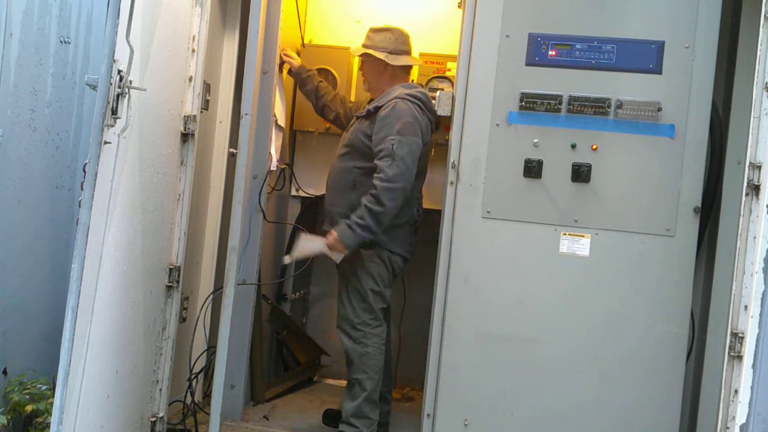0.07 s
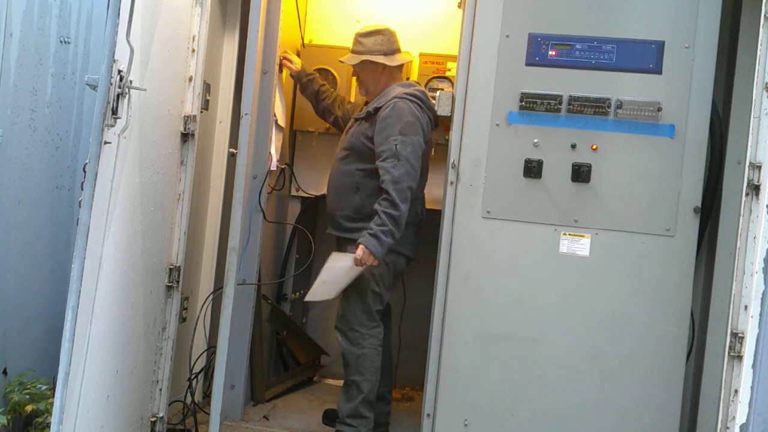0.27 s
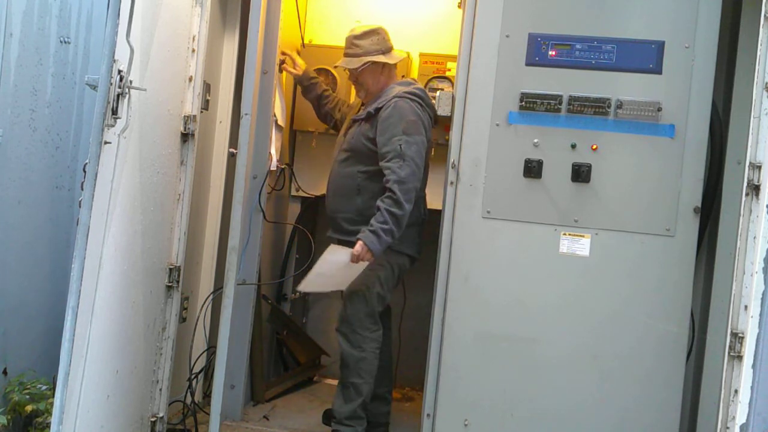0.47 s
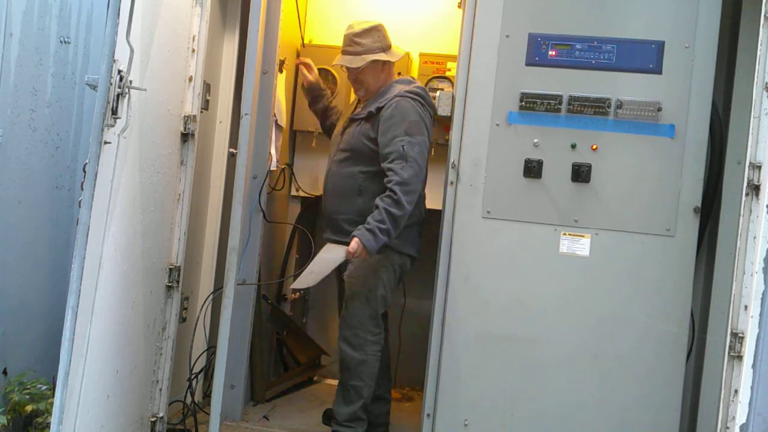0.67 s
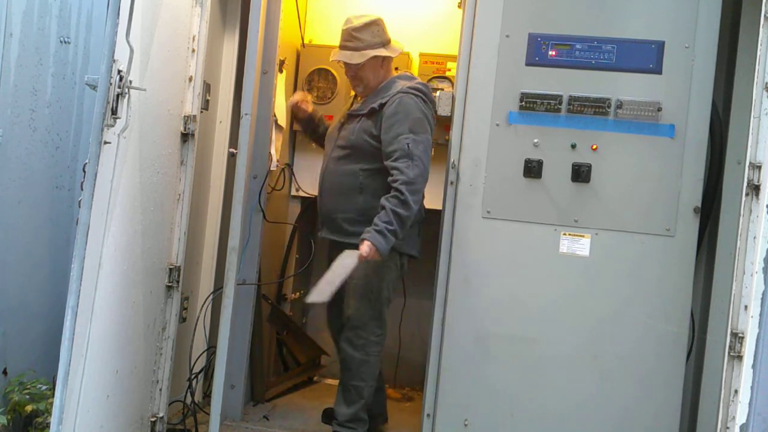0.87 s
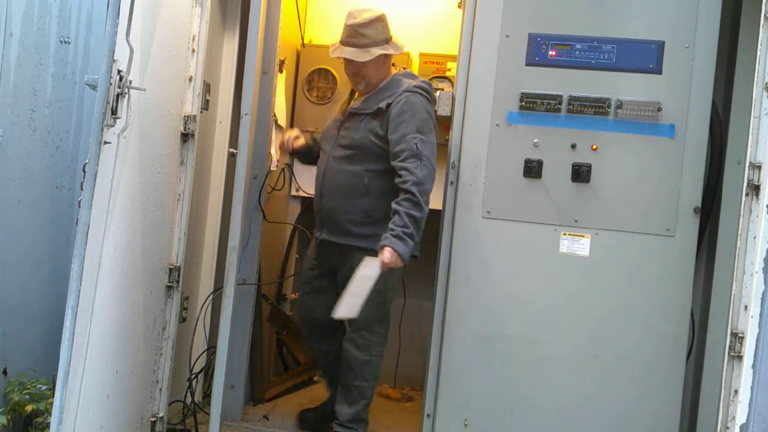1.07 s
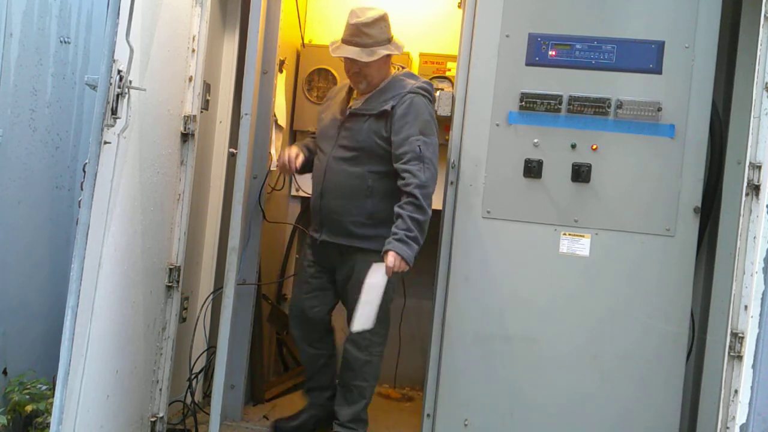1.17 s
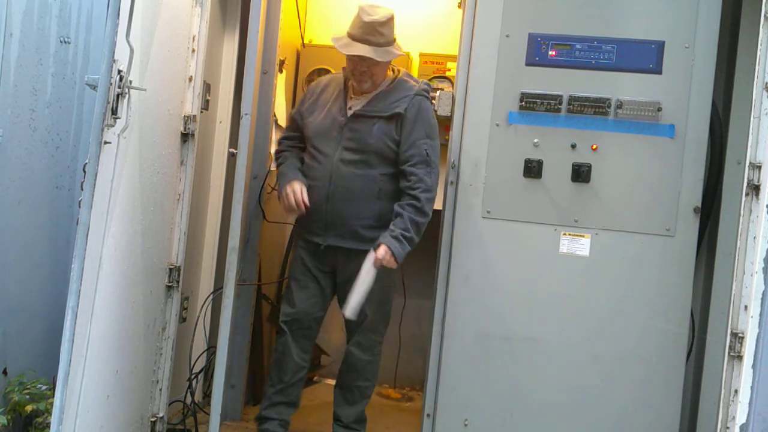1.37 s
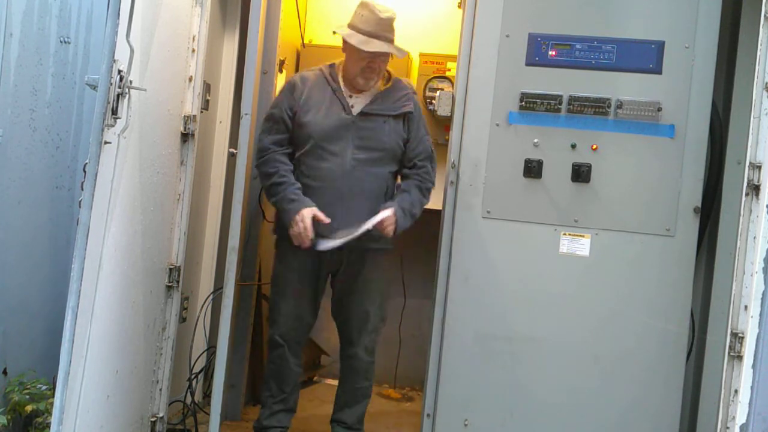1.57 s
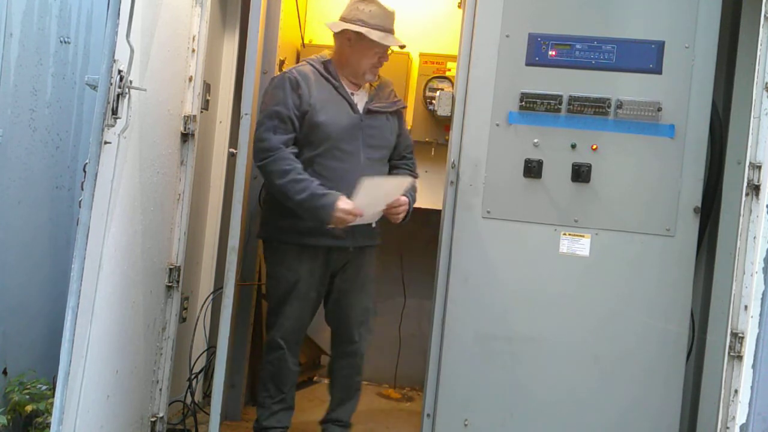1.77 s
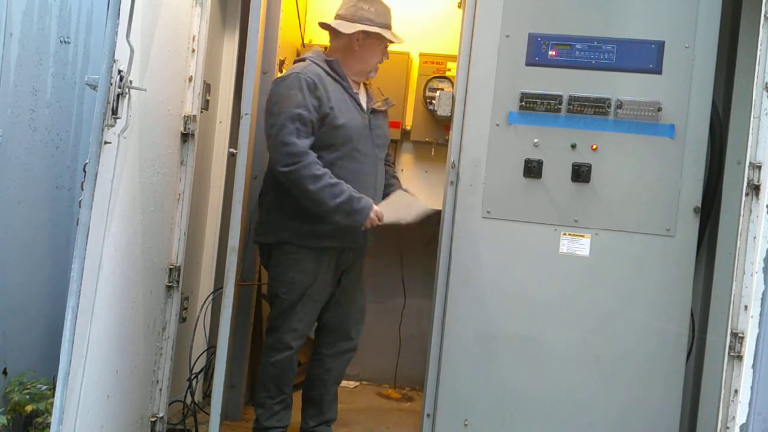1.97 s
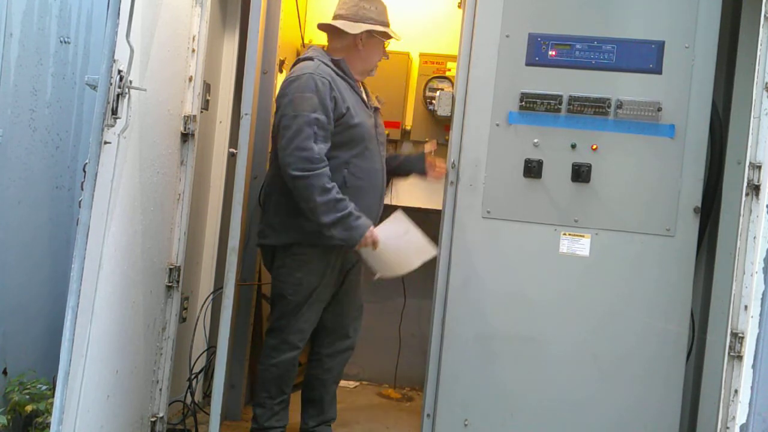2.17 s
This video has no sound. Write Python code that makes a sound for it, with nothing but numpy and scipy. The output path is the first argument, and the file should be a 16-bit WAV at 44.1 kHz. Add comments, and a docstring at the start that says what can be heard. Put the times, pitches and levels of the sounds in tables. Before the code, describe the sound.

A small generator whirrs and hums steadily, with a few light clicks and clothing rustles.

```python
"""In the doorway of a generator room

One microphone at the open door, a small hydro generator running steadily in the room beyond.
Its iron hums on multiples of twice the mains frequency, over the whirr of turbine and cooling air.
Nearer, someone in the doorway makes a few light clicks and turns with a rustle of jacket and paper."""
import sys
import numpy as np
from scipy import signal
from scipy.fft import rfft, irfft
from scipy.io import wavfile

SR = 44100
rng = np.random.default_rng(int(sys.argv[2]) if len(sys.argv) > 2 else 0)


def inscribe(sig):
    """Save sig as 16-bit PCM at rate SR to the path in sys.argv[1].

    A 1-D sig is mono; a 2-D sig holds one channel per row.
    Samples are clipped to [-1, 1] before scaling.
    """
    pcm = np.round(np.clip(np.atleast_2d(sig).T, -1, 1) * 32767)
    wavfile.write(sys.argv[1], SR, pcm.astype(np.int16))


N = 97284


def from_db(db):
    """Decibels to gain."""
    return 10 ** (np.asarray(db) / 20)


def rms_one(x):
    """Scale to unit rms."""
    return x / np.sqrt(np.mean(x ** 2) + 1e-20)


def seconds():
    """Time of every sample."""
    return np.arange(N) / SR


def drift(rate_hz):
    """Random wander with spread 1: noise twice through a one-pole low-pass."""
    step, run_in = 40, 2000  # samples per point, points of settling
    pole = np.exp(-2 * np.pi * rate_hz * step / SR)
    noise = rng.standard_normal(N // step + run_in + 2)
    slow = signal.lfilter([1], [1, -2 * pole, pole * pole], noise)[run_in:]
    return np.interp(np.arange(N) / step, np.arange(len(slow)), rms_one(slow - slow.mean()))


def coloured_noise(colour, tilt_db=0):
    """Unit noise with the given spectrum, tilted by so many dB per octave."""
    bin_octaves = np.log2(np.maximum(np.arange(N // 2 + 1) * SR / N, 1))
    hz, db = np.transpose(colour)
    corners = np.log2(hz)
    gain = from_db(np.interp(bin_octaves, corners, db + tilt_db * corners))
    return rms_one(irfft(rfft(rng.standard_normal(N)) * gain, N))


def ringing_noise(hz, width_hz):
    """Unit noise through a two-pole resonance, run in for a second."""
    radius = np.exp(-np.pi * width_hz / SR)
    feedback = [1, -2 * radius * np.cos(2 * np.pi * hz / SR), radius * radius]
    return rms_one(signal.lfilter([1, 0, -1], feedback, rng.standard_normal(N + SR))[SR:])


# Turbine and cooling air, heard through the door: (frequency [Hz], relative density [dB])
WHIRR_COLOUR = [(25, -18), (60, -19.5), (100, -14), (150, -10.5), (200, -7.5), (330, -7), (480, -3.5),
                (680, -2), (900, 1), (1300, -1.5), (2000, -2), (2800, -3), (3900, -9), (4800, -18.5),
                (5400, -13), (6100, -9), (7100, -13), (7600, -20.5), (8100, -28.5), (8800, -39.5),
                (9300, -50.5)]
# Resonances of the housing: (frequency [Hz], width [Hz], rms level [dB])
HOUSING_MODES = [(456, 12, -56), (837, 55, -50), (5260, 30, -68.5), (5900, 12, -57.5), (6660, 23, -61.5)]
# Brief swells in the whirr's midrange: (time [s], half-width [s], level [dB], centre [Hz])
WHIRR_SWELLS = [(1.19, 0.025, -37, 1270), (2.197, 0.018, -33, 970)]


def turbine_whirr(flow_db=-35.5, swell_reach_octaves=0.27):
    """Inside the room: even flow noise keeps the housing ringing, and swells briefly twice."""
    out = from_db(flow_db) * coloured_noise(WHIRR_COLOUR)
    for hz, width_hz, db in HOUSING_MODES:
        out += from_db(db) * ringing_noise(hz, width_hz)
    reach = 2 ** swell_reach_octaves
    for peak_s, width_s, db, hz in WHIRR_SWELLS:
        band = signal.butter(2, [hz / reach, hz * reach], "band", fs=SR, output="sos")
        midrange = rms_one(signal.sosfilt(band, rng.standard_normal(N)))
        swell = np.exp(-((seconds() - peak_s) / width_s) ** 2)
        out += from_db(db) * swell * midrange
    return out


# Partials of the humming iron, at the door: (multiple of the hum frequency, rms level [dB])
HUM_PARTIALS = [(1, -62), (2, -54), (3, -54.5), (5, -44.5), (6, -46), (7, -52), (8, -44), (9, -52),
                (10, -52.5), (11, -59.5), (12, -60)]


def generator_hum(hum_hz=120.02, waver_db=0.38, waver_rad=0.08, waver_hz=1.7):
    """Inside the room: iron vibrates at multiples of twice the mains frequency, each wavering a little."""
    out = np.zeros(N)
    for multiple, db in HUM_PARTIALS:
        phase = 2 * np.pi * (multiple * hum_hz * seconds() + rng.random())
        phase += waver_rad * drift(waver_hz)
        amplitude = np.sqrt(2) * from_db(db + waver_db * drift(waver_hz))
        out += amplitude * np.sin(phase)
    return out


# Movements in the doorway: (peak time [s], rise [s], fall [s], cloth level [dB], hiss level [dB])
MOVEMENTS = [(.27, 0.019, 0.037, -40, -51), (0.344, 0.013, 0.028, -35.5, -43),
             (0.38, 0.046, .045, -36, -46), (.592, 0.02, 0.0097, -36.5, -54),
             (1.77, 0.082, 0.035, -39.5, -43), (1.83, 0.045, 0.087, -36, -45),
             (1.938, 0.042, 0.044, -36.5, -37.5), (2.08, 0.038, 0.085, -41.5, -52)]
# Dull rub of the jacket: (frequency [Hz], relative density [dB])
RUB_COLOUR = [(100, -30), (900, -7.5), (1400, 3.5), (2000, -1.5), (2400, 3), (2700, -0.5), (3100, -5.5),
              (4000, -11), (5000, -25), (8000, -47)]
# Bright hiss of jacket and paper: (frequency [Hz], relative density [dB])
FRICTION_HISS_COLOUR = [(1500, -22.5), (3800, -12), (4800, -9), (5500, -4.5), (6300, 1), (7100, -4.5),
                        (8100, -25), (9200, -38.5)]


def jacket_and_paper(grain_db=1.5, grain_hz=130):
    """Near the microphone: each movement is a swell of grainy friction, a dull rub and a bright hiss."""
    out = np.zeros(N)
    for peak_s, rise_s, fall_s, cloth_db, hiss_db in MOVEMENTS:
        age = seconds() - peak_s
        swell = np.exp(-(age / np.where(age < 0, rise_s, fall_s)) ** 2)
        grains = rms_one(from_db(grain_db * drift(grain_hz)))
        rub = from_db(cloth_db) * coloured_noise(RUB_COLOUR)
        hiss = from_db(hiss_db) * coloured_noise(FRICTION_HISS_COLOUR)
        out += swell * grains * (rub + hiss)
    return out


# Light clicks in the doorway: (time [s], level [dB], treble tilt [dB per octave])
HANDLING_CLICKS = [(.002, -30, -9), (.012, -38, 4), (0.567, -30, -7), (0.749, -26.5, 1), (0.758, -39, 3),
                   (0.884, -36, -3), (.9335, -37.5, 14), (0.9563, -36.5, 3), (0.968, -48.5, 5),
                   (1.108, -42.5, 17)]
# Spectrum of a click before its tilt: (frequency [Hz], relative density [dB])
CRACK_COLOUR = [(100, -52), (1500, -15.5), (2600, -3), (3500, -1.5), (4500, -10), (5200, -1.5), (6300, 6),
                (7200, 4.5), (8200, -19.5), (9200, -32.5)]


def handling_clicks(crack_t60_s=0.028, room_db=-4, room_t60_s=0.17):
    """Near the microphone: each click is a short crack followed by the small room's tail."""
    out = np.zeros(N)
    for start_s, db, tilt_db in HANDLING_CLICKS:
        age = np.maximum(seconds() - start_s, 0)
        crack = from_db(-60 * age / crack_t60_s)
        room_tail = from_db(room_db - 60 * age / room_t60_s)
        envelope = (age > 0) * np.hypot(crack, room_tail)  # the two add in power
        out += from_db(db) * envelope * coloured_noise(CRACK_COLOUR, tilt_db)
    return out


def scene():
    """The machine with the small sounds of the doorway in front of it, in mono."""
    machine = generator_hum() + turbine_whirr()
    doorway = handling_clicks() + jacket_and_paper()
    return (machine + doorway)[None]


def record(dry):
    """The microphone's signal, cut steeply above 8880 Hz."""
    low_pass = signal.butter(64, 8880, fs=SR, output="sos")
    return signal.sosfilt(low_pass, dry)


dry = scene()
out = record(dry)
inscribe(out)
```